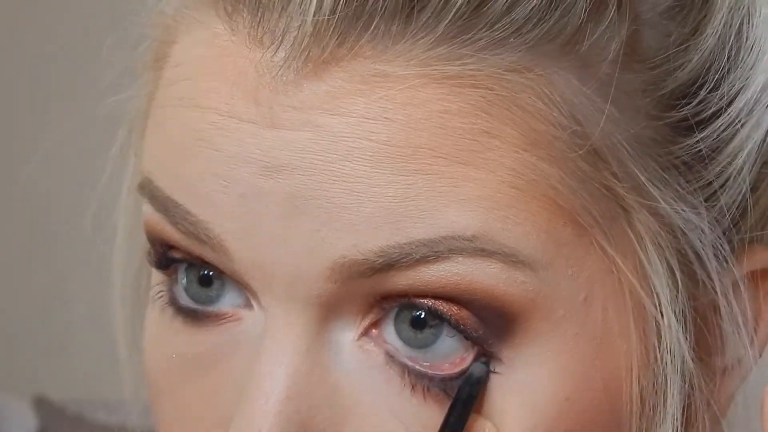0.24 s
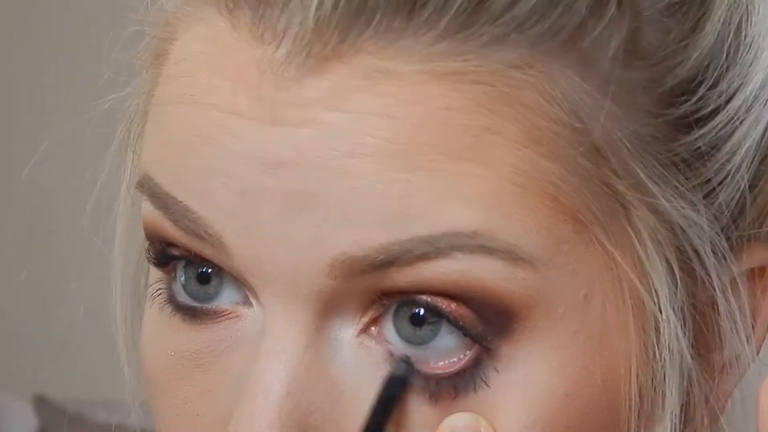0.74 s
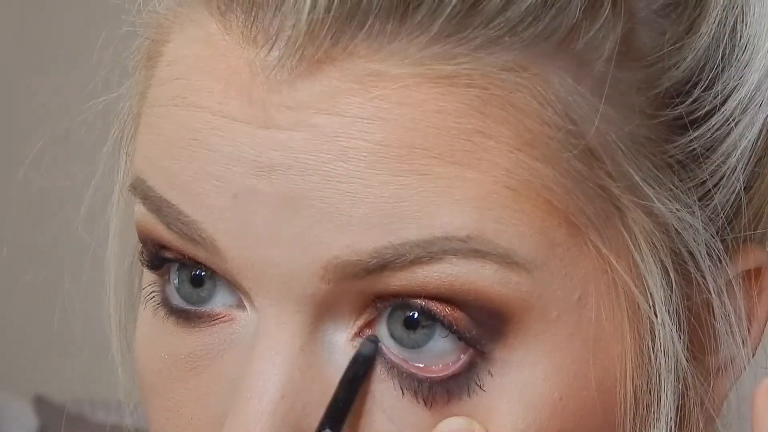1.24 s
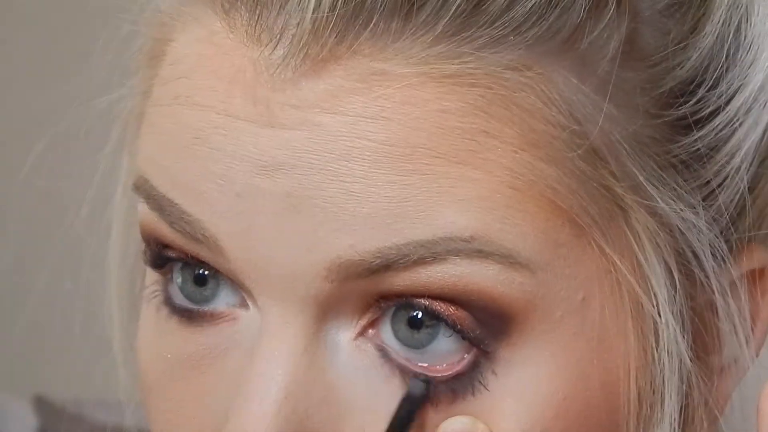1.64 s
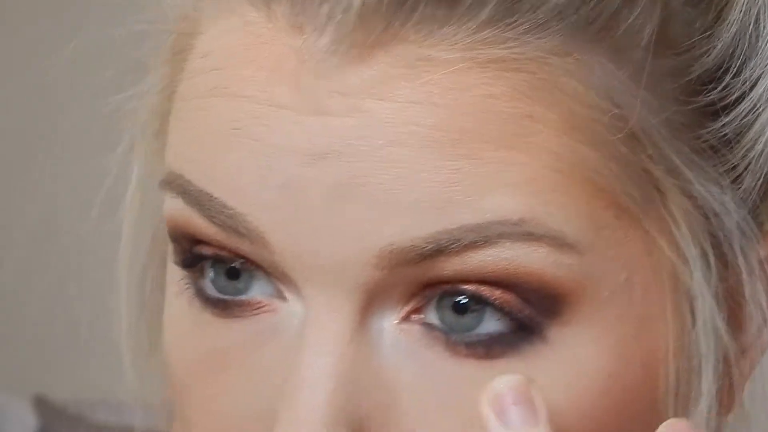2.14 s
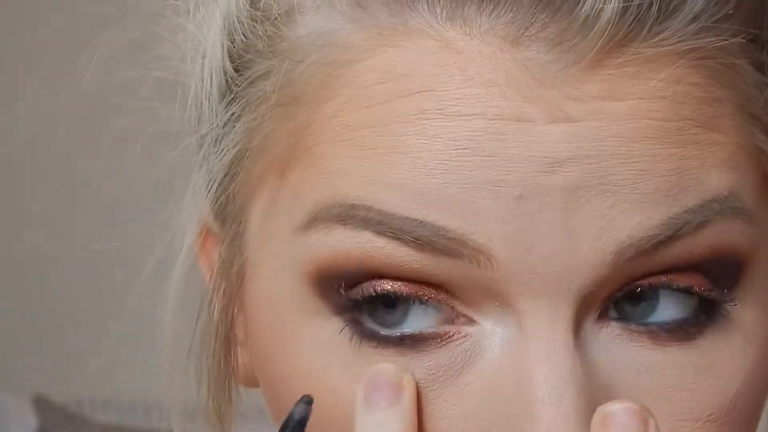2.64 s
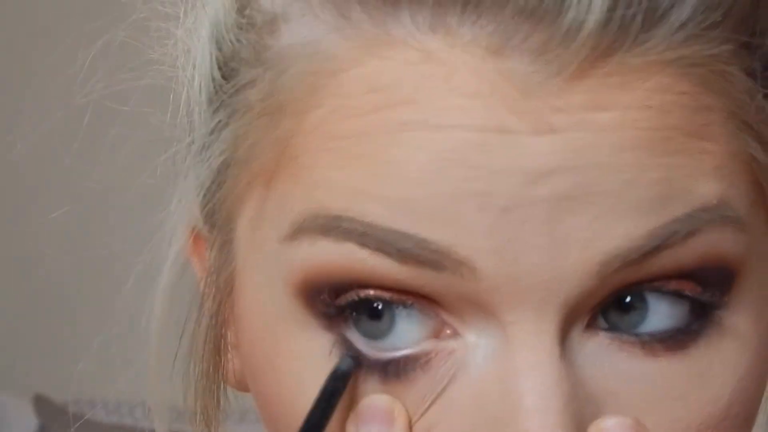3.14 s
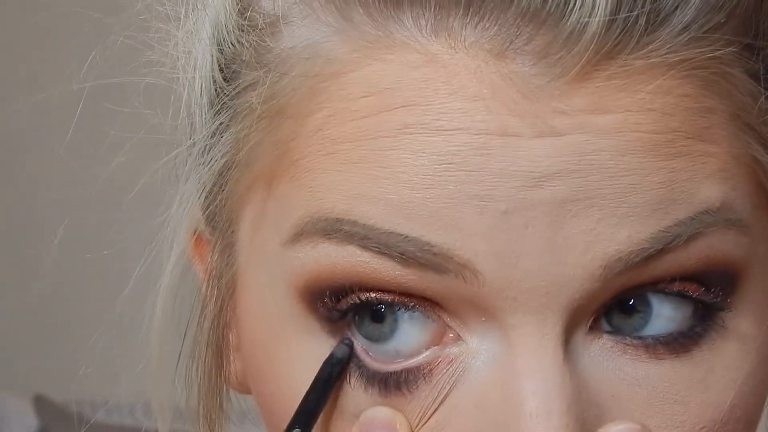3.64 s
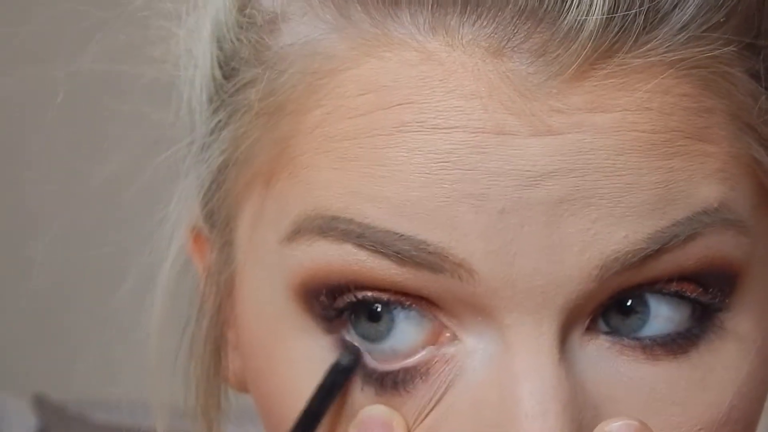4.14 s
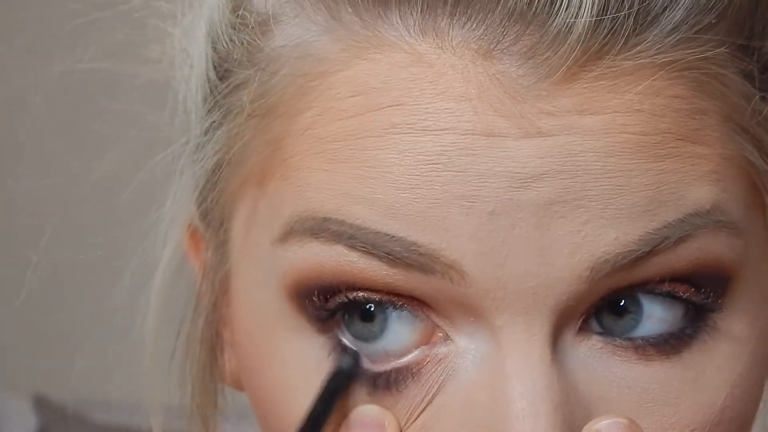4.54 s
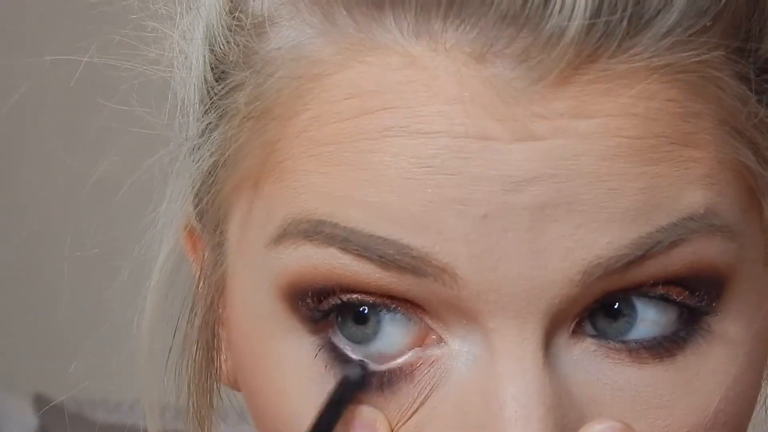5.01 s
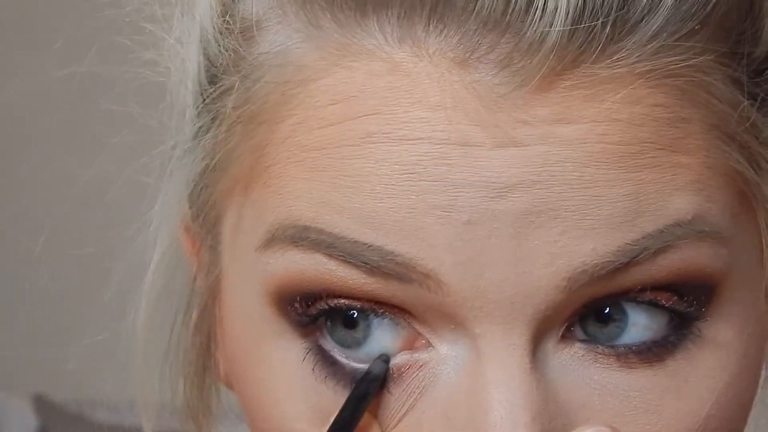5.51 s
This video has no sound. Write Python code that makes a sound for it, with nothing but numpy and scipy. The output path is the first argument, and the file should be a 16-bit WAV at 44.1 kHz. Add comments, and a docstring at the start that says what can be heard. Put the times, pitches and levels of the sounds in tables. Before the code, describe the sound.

A steady low motor hum and muffled rush of moving air, slightly to the right, fill a quiet room throughout. Close to a stereo microphone, a soft makeup pencil makes tiny dry swishes near an eye, in irregular groups, with a sparser passage around the middle of the first half. Light rubbing lies beneath some strokes, and a soft treble hiss stays on top.

```python
"""Make-up pencil in a quiet room

Someone draws a soft pencil along an eyelid: faint swishes of bright and dull noise, over light rubbing.
A motor a little to the right hums in wandering sine lines; its moving air is a broad noise rush with
narrow resonances. Three narrow low bands, made as wavering sines, have brief chance swells of level.
A soft treble hiss, separate left and right, has small shared level changes; a stereo microphone is close."""
import sys
import numpy as np
from scipy import signal
from scipy.fft import rfft, irfft
from scipy.io import wavfile
from scipy.ndimage import uniform_filter1d

SR = 44100
rng = np.random.default_rng(int(sys.argv[2]) if len(sys.argv) > 2 else 0)


def store_pcm(level_fs):
    """Save levels as 16-bit WAV."""
    pcm = np.round(np.clip(level_fs, -1, 1) * 32767).astype(np.int16)
    wavfile.write(sys.argv[1], SR, np.atleast_2d(pcm).T)


N = 254456  # samples
TIME = np.arange(N) / SR  # seconds
FREQ = np.maximum(np.fft.rfftfreq(N, 1 / SR), 1)  # Hz, at least 1 so that its logarithm exists


def undb(db):
    """Decibels to amplitude gain."""
    return 10 ** (np.asarray(db) / 20)


def across(points):
    """Joins (Hz, value) points on a log-frequency axis."""
    hz, value = np.transpose(points)
    return np.interp(np.log(FREQ), np.log(hz), value)


def noise(gain, likeness=0):
    """Stereo noise of rms 1 with the given colour and correlation between the channels."""
    mid, side = rfft(rng.standard_normal((2, N)))
    alike = np.clip(likeness, -1, 1)
    mid = mid * np.sqrt(1 + alike)
    side = side * np.sqrt(1 - alike)
    x = irfft(gain * np.array([mid + side, mid - side]), N)
    return x / x.std()


def walk(rate):
    """Smooth random curve of mean 0 and spread 1; rate (Hz) sets how fast it changes."""
    x = irfft(rfft(rng.standard_normal(N)) * np.exp(-(FREQ / rate) ** 2), N)
    return (x - x.mean()) / x.std()


def swell(s, length):
    """A smooth rise and fall around s, half as high at the ends of its length."""
    return np.exp(-np.log(2) * (2 * (TIME - s) / length) ** 2)


# The clearest pencil strokes, heard close to the microphone. Each row: peak time in seconds,
# bright level at the peak in dB, nominal length in seconds, dull part in dB relative to the bright.
STROKES = [(0.155, -68, 0.033, 3), (.23, -67.5, 0.032, -1), (0.52, -68, 0.034, 1), (0.625, -64, 0.032, -1),
           (.664, -70, .02, -4), (0.725, -68.5, 0.025, 0), (.768, -70, .03, 0), (0.906, -62.5, 0.024, -1.5),
           (1.01, -72.5, .04, 0), (1.2, -73, .025, 4), (1.962, -65.5, 0.032, 1.5), (2.183, -66, 0.026, -2),
           (2.246, -68.5, 0.036, -1), (2.645, -67.5, 0.03, -1), (2.703, -71, .022, 6),
           (2.94, -69, .035, -4), (3.01, -67, 0.035, -2), (3.913, -70, .03, 1), (4.068, -63.3, 0.032, -1),
           (4.184, -71, .035, -2), (4.232, -69.5, 0.035, -1), (4.317, -63.5, .026, -5),
           (4.472, -66, 0.031, -1.5), (4.648, -63.8, .044, -3.5), (4.76, -66.7, .04, 0),
           (4.85, -73, .03, -3), (5.01, -72, .03, -2), (5.103, -63.3, 0.027, -6), (5.134, -75, 0.025, 0),
           (5.37, -67.7, 0.032, -0.5), (5.69, -67.3, .035, -2)]
# Colour of the bright part of a swish. Each row: frequency in Hz, relative density in dB per Hz.
BRIGHT_COLOUR = [(4000, -24), (6200, -4), (7200, -2.5), (8600, -3.5), (9500, 2.5), (10100, -2.5),
                 (10650, 1), (11000, -2), (11450, 0.5), (11900, -4.5), (12700, -4.5), (13800, -27)]
# Colour of the dull part of a swish. Each row: frequency in Hz, relative density in dB per Hz.
DULL_COLOUR = [(1500, -4.5), (3000, -1.5), (4500, 0), (4930, 2.5), (5300, -4), (5900, -4), (6800, -14),
               (9000, -12), (14000, -49)]
RUB_DULL_DB = 0.5  # dull part of the light rubbing, relative to the bright


def swishes(grain_db=2.0, scratch_db=1.3, likeness=0.075):
    """Pencil friction: bright and dull noise, each roughened by the skin's grain, blended per stroke."""
    bright_power = rubbing_power()
    dull_power = bright_power * undb(RUB_DULL_DB) ** 2
    for s, db, length, dull_db in STROKES:
        stroke = undb(db) ** 2 * stroke_power(s, length)
        bright_power = bright_power + stroke
        dull_power = dull_power + stroke * undb(dull_db) ** 2
    bright = np.sqrt(bright_power) * noise(undb(across(BRIGHT_COLOUR)), likeness)
    bright = bright * undb(scratch_db * walk(170))
    dull = np.sqrt(dull_power) * noise(undb(across(DULL_COLOUR)), likeness)
    dull = dull * undb(grain_db * walk(320))
    return patchy(bright + dull, spread_db=3.5)


CATCH_SHARE, SLIDE_SHARE = 0.89, 1.35  # scale the stroke's length before and after its peak


def stroke_power(s, length):
    """The pencil catches quickly, then slides off more slowly."""
    catch = swell(s, length * CATCH_SHARE)
    slide = swell(s, length * SLIDE_SHARE)
    return np.where(TIME < s, catch, slide)


# Light rubbing of the pencil on the eyelid. Each row: start in seconds, end in seconds,
# level in dB before the pressure varies it.
RUBBING_SPELLS = [(.14, 1.4, -81.5), (2.6, 5.5, -78.7)]
RUB_FADE_S, RUB_RATE_HZ, RUB_SPREAD_DB = 0.075, 13, 3.5


def rubbing_power():
    """Power of the light rubbing, whose pressure varies by chance."""
    contact = 0
    for start, end, db in RUBBING_SPELLS:
        nearest_end = np.minimum(TIME - start, end - TIME)
        contact = contact + undb(db) * np.clip(nearest_end / RUB_FADE_S, 0, 1)
    pressure = undb(RUB_SPREAD_DB * walk(RUB_RATE_HZ))
    return (contact * pressure) ** 2


def patchy(x, spread_db, size=512):
    """Narrow bands flare and fade over some milliseconds, alike in both channels; mean gain power is 1."""
    bands = signal.stft(x, nperseg=size)[2]
    chance = rng.standard_normal(bands.shape[1:])
    chance = uniform_filter1d(chance, size=4, axis=0)  # along frequency
    chance = uniform_filter1d(chance, size=3, axis=1)  # along time
    gain = undb(spread_db * chance / chance.std())
    gain = gain / np.sqrt(np.mean(gain ** 2))
    return signal.istft(bands * gain, nperseg=size)[1][:, :N]


# Hum of the motor, a little to the right. Each row: frequency in Hz, rms level in dB
# before sway and stereo balance.
HUM_LINES = [(35.4, -71), (58.85, -56.5), (117.7, -67)]


def motor(drift_hz=0.14, sway_db=2.0):
    """Low sine lines, each wandering a little in frequency and strength."""
    out = 0
    for hz, db in HUM_LINES:
        turns = np.cumsum(hz + drift_hz * walk(1.3)) / SR + rng.random()
        level = np.sqrt(2) * undb(db + sway_db * walk(2.5))  # root 2 turns rms into peak
        out = out + level * np.sin(2 * np.pi * turns)
    return out


# Three narrow low bands in the room sound. Each entry: name, then centre frequency in Hz and
# resting rms level in dB before sway and stereo balance.
LOW_BANDS = {"low": (155.5, -61), "mid": (378.8, -66.5), "high": (441, -65.5)}
# Brief chance swells of their level. Each row: middle in seconds, name of the band,
# added rms level in dB before stereo balance, length in seconds.
CHANCE_SWELLS = [(0.03, "high", -52, 0.034), (0.212, "high", -50.5, 0.031), (0.214, "low", -49.5, 0.07),
                 (0.407, "high", -49, 0.033), (0.584, "low", -46.5, 0.04), (0.658, "low", -49, .035),
                 (0.727, "high", -53.5, .04), (0.748, "low", -47.5, .05), (0.84, "low", -50, 0.045),
                 (1.188, "low", -47.5, 0.094), (1.636, "mid", -56, .07), (2.27, "mid", -53, .04),
                 (2.32, "high", -50, 0.045), (2.42, "mid", -56, .05), (2.61, "low", -48, 0.023),
                 (2.94, "mid", -54.5, 0.084), (2.953, "low", -48, 0.03), (3.282, "high", -52.5, .04),
                 (3.35, "mid", -51.5, 0.036), (3.45, "low", -49, .04), (3.535, "mid", -54.5, 0.085),
                 (3.556, "high", -52.5, 0.034), (3.668, "low", -49.5, 0.13), (3.773, "mid", -55, 0.11),
                 (3.93, "high", -50.5, 0.03), (4.035, "low", -46.5, 0.053), (4.333, "low", -48, 0.045),
                 (4.458, "low", -44.5, 0.038), (4.68, "low", -48.5, .03), (4.8, "low", -53, 0.1),
                 (4.88, "high", -54.5, .07), (4.972, "high", -51.5, .04), (5.08, "mid", -54, .05),
                 (5.15, "low", -48.5, 0.045), (5.309, "low", -45, 0.037), (5.38, "low", -46, 0.023)]


def low_bands(wander_hz=2.5, sway_db=2.0):
    """Sines spread into narrow bands by a shared pitch wander; swells add power to a swaying level."""
    wander = np.cumsum(wander_hz * walk(9.7)) / SR
    power = {}
    for name, (hz, db) in LOW_BANDS.items():
        power[name] = undb(db + sway_db * walk(11)) ** 2
    for s, name, db, length in CHANCE_SWELLS:
        power[name] = power[name] + undb(db) ** 2 * swell(s, length)
    out = 0
    for name, (hz, db) in LOW_BANDS.items():
        turns = hz * TIME + wander + rng.random()
        band = np.sqrt(2) * np.sin(2 * np.pi * turns)
        out = out + np.sqrt(power[name]) * band
    return out


# Broad rush of air in the room. Each row: frequency in Hz, relative density in dB per Hz.
AIR_COLOUR = [(20, -32), (44, -18), (68, -10.5), (90, -2.5), (125, -4.5), (170, -6), (200, -13.5),
              (270, -18.5), (350, -12), (560, -17), (900, -23), (1600, -24), (3000, -31.5), (8000, -48.5)]
AIR_DB = -49.5  # rms of the rush before flutter and stereo balance
# Resonances that the air excites. Each row: frequency in Hz, width in Hz, rms level in dB
# before flutter and stereo balance.
AIR_RESONANCES = [(84.5, 4.9, -62.5), (101, 10, -63.5), (117.7, 6.9, -65), (145, 22, -60.5),
                  (223, 15, -72.5), (249.4, 10, -76), (343, 9, -67.5), (370.5, 8.9, -66.5), (379, 8.2, -63),
                  (414.7, 17, -63.5), (438.5, 18.7, -58), (465, 11.6, -62.3), (499, 8.5, -72),
                  (541, 16, -75.5), (649.6, 37, -68), (812, 39, -74.5), (971, 40, -71), (1206, 59, -71),
                  (1370, 47, -77), (1555, 48, -74.5), (1730, 67, -80), (1865, 44, -80), (2290, 300, -77),
                  (2664, 65, -82)]
# Likeness of the air sound at the two capsules. Each row: frequency in Hz, correlation.
CAPSULE_LIKENESS = [(60, 1), (130, 0.92), (290, 0.93), (640, 0.76), (1410, 0.49), (3100, 0.0011), (6800, 0)]


def air(flutter_db=0.68):
    """Moving air: a broad rush plus narrow resonances; long waves reach both capsules alike."""
    likeness = across(CAPSULE_LIKENESS)
    out = undb(AIR_DB) * noise(undb(across(AIR_COLOUR)), likeness)
    for hz, width, db in AIR_RESONANCES:
        detune = (FREQ ** 2 - hz ** 2) / (FREQ * width)
        out = out + undb(db) * noise(1 / (1 + detune ** 2 / 2), likeness)
    return out * undb(flutter_db * walk(12.0))


# Colour of the soft treble hiss. Each row: frequency in Hz, relative density in dB per Hz.
HISS_COLOUR = [(1000, -9), (4000, 1.5), (7000, -2), (10500, -0.9), (13000, -2.5), (15500, -5)]
# Slow course of the hiss. Each row: time in seconds, rms level in dB before the small changes.
HISS_COURSE = [(0, -65.5), (1, -68), (1.5, -67), (2.4, -68.5), (3.1, -66.5), (4.7, -67), (5.75, -67.6)]
# Moments of softer treble. Each row: middle in seconds, length in seconds.
TREBLE_LULLS = [(0.087, 0.055), (0.835, .04), (2.1, 0.085)]
LULL_DB = -7  # change at the middle of a lull


def hiss(change_db=1.6):
    """Soft treble noise, separate left and right, with small level changes shared by both channels."""
    course_db = np.interp(TIME, *np.transpose(HISS_COURSE))
    lull_db = LULL_DB * sum(swell(s, length) for s, length in TREBLE_LULLS)
    level = undb(course_db + lull_db + change_db * walk(28))
    return level * noise(undb(across(HISS_COLOUR)))


RIGHT_DB = 1.56  # level of the right channel over the left for motor, air and low bands


def scene():
    """Motor, air and low bands fill the room, a little to the right; swishes and hiss lie on top."""
    balance = undb(np.array([[-RIGHT_DB], [RIGHT_DB]]) / 2)
    room = balance * (motor() + air() + low_bands())
    return swishes() + room + hiss()


# Narrow notches of the recorder. Each row: frequency in Hz, width in Hz.
RECORDER_NOTCHES = [(2500, 61), (7540, 68)]
TOP_HZ = 15720  # edge of the recorder's top cut


def record(dry):
    """The recorder notches two narrow bands and cuts the top with a steep elliptic low-pass."""
    for hz, width in RECORDER_NOTCHES:
        b, a = signal.iirnotch(hz, hz / width, fs=SR)
        dry = signal.lfilter(b, a, dry)
    top_cut = signal.ellip(12, .1, 70, TOP_HZ, fs=SR, output="sos")  # 0.1 dB ripple, 70 dB stop
    return signal.sosfilt(top_cut, dry)


dry = scene()
out = record(dry)
store_pcm(out)
```